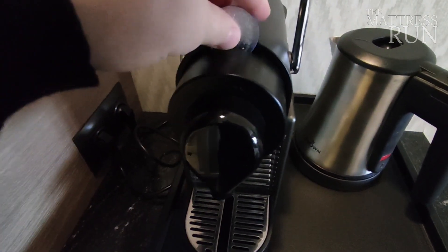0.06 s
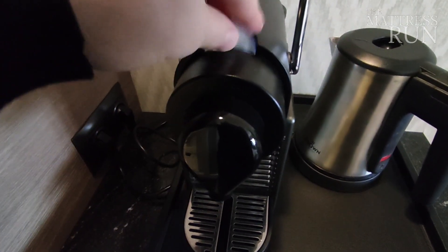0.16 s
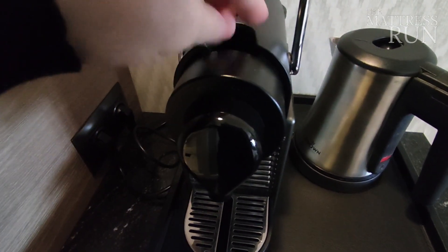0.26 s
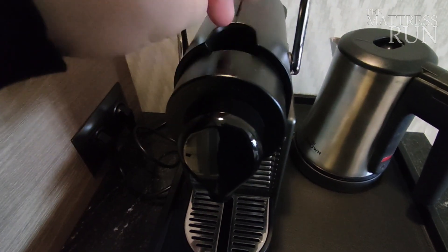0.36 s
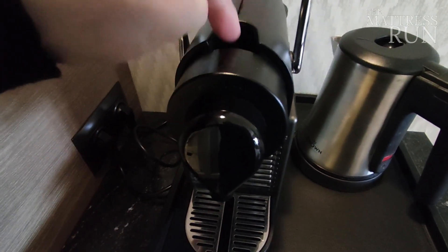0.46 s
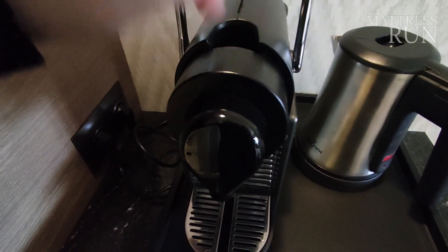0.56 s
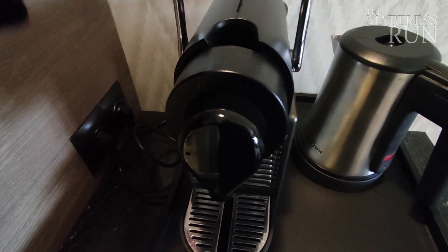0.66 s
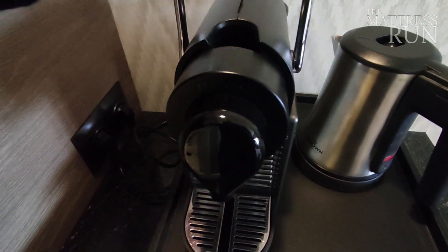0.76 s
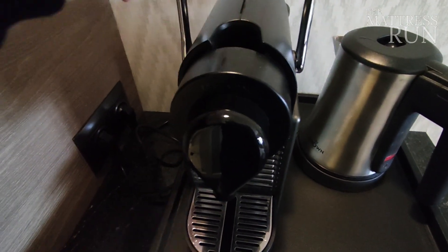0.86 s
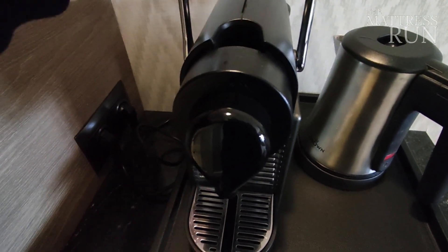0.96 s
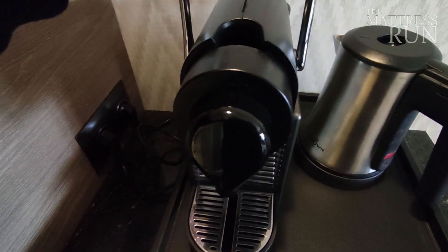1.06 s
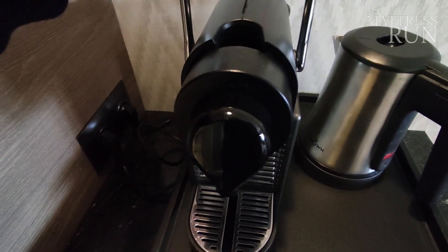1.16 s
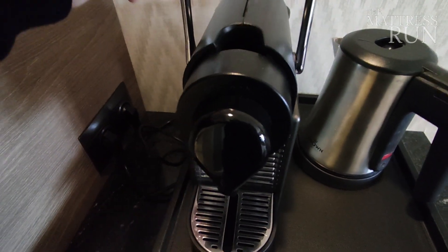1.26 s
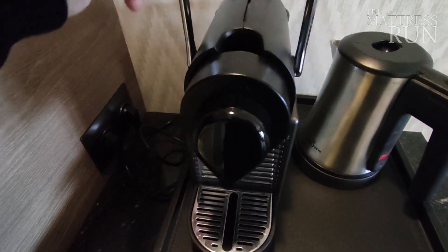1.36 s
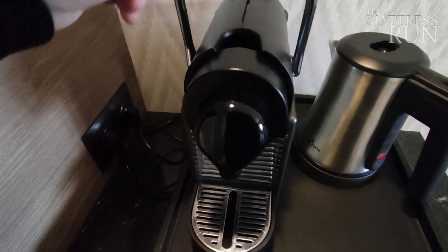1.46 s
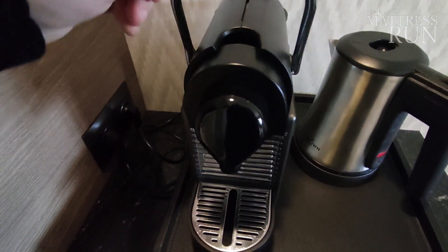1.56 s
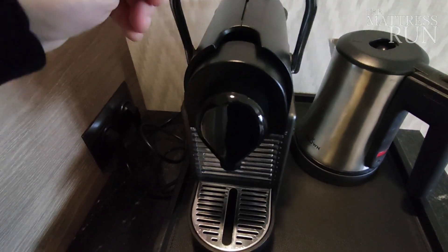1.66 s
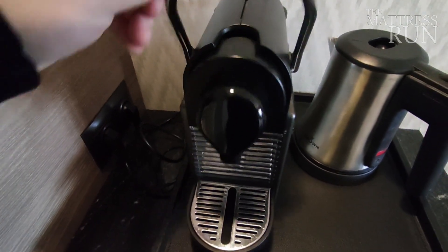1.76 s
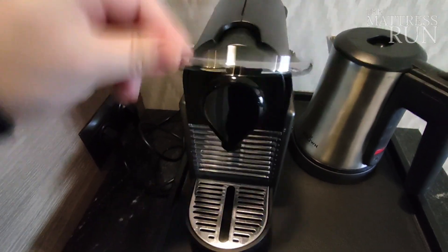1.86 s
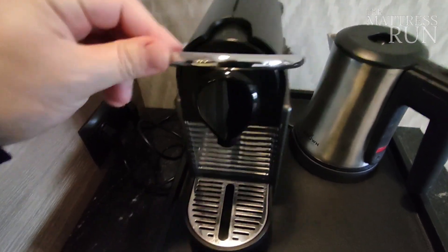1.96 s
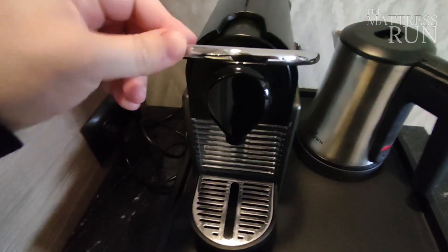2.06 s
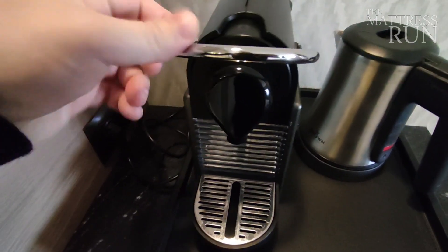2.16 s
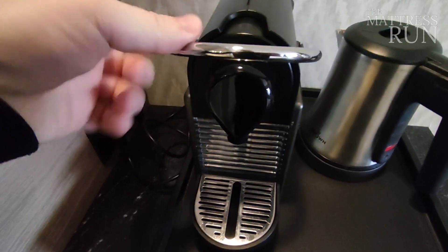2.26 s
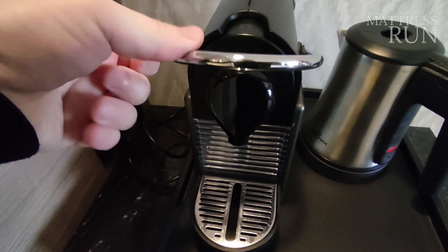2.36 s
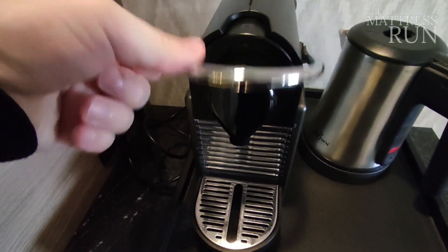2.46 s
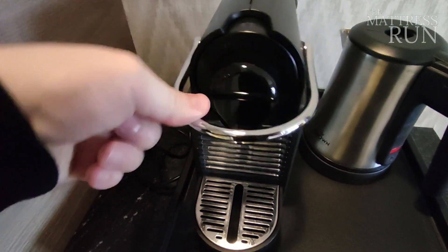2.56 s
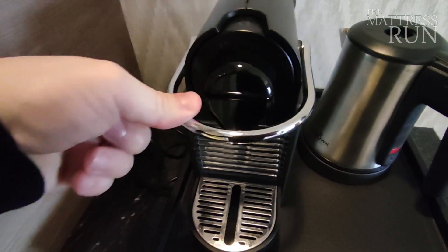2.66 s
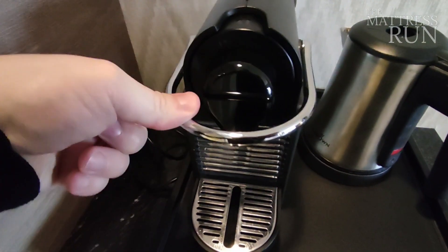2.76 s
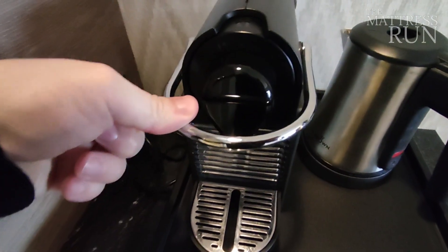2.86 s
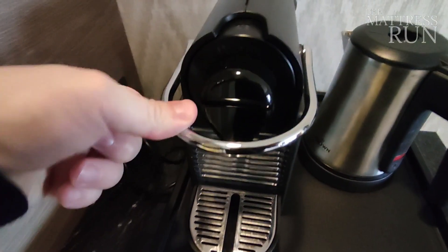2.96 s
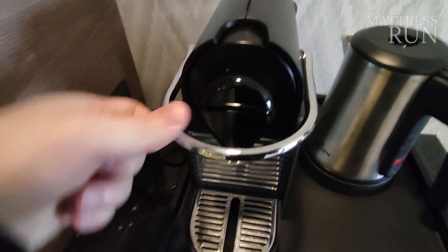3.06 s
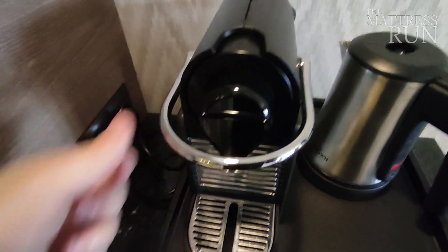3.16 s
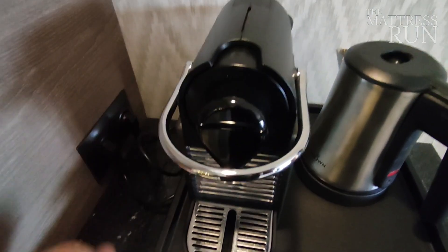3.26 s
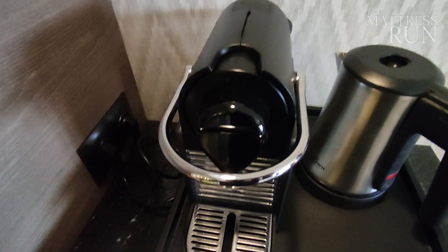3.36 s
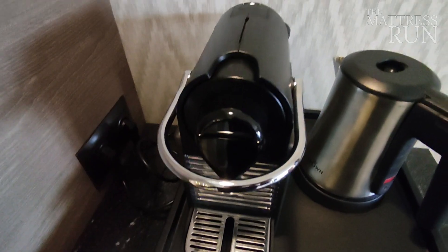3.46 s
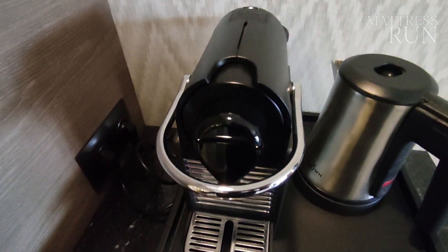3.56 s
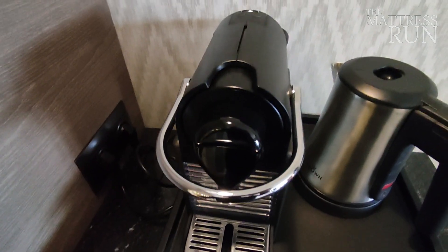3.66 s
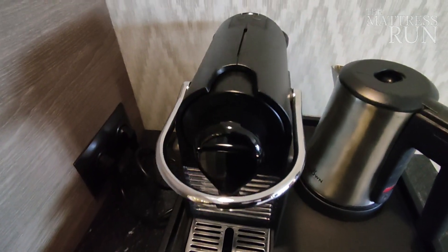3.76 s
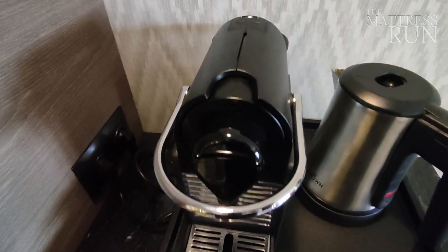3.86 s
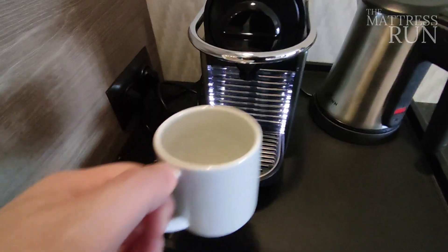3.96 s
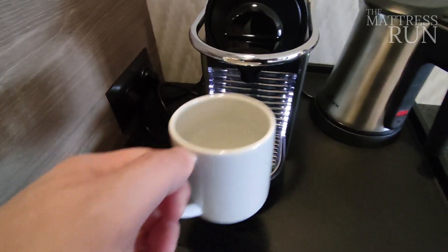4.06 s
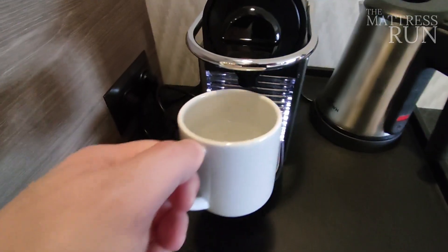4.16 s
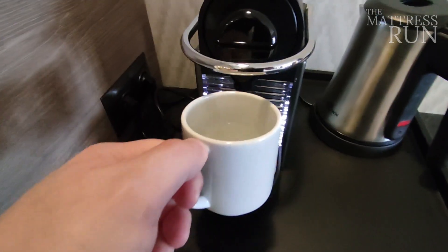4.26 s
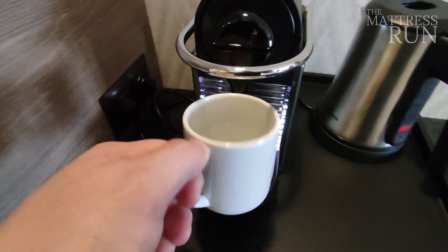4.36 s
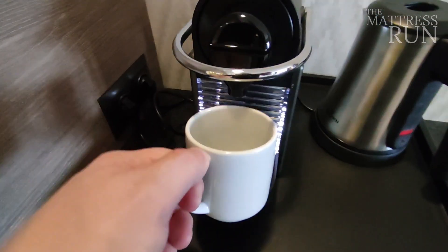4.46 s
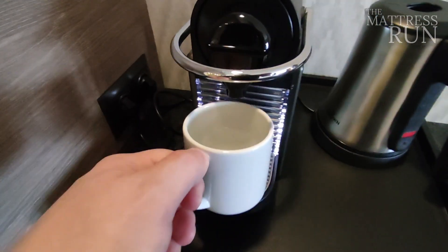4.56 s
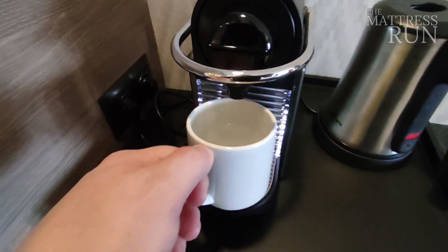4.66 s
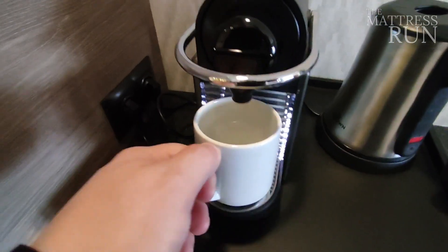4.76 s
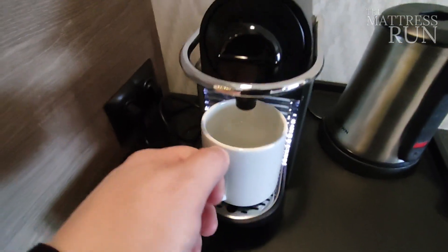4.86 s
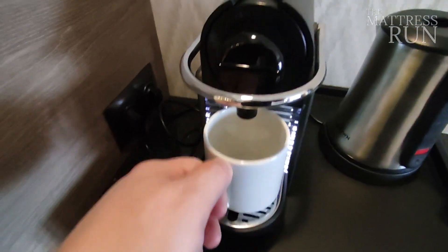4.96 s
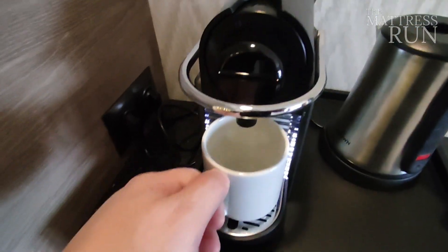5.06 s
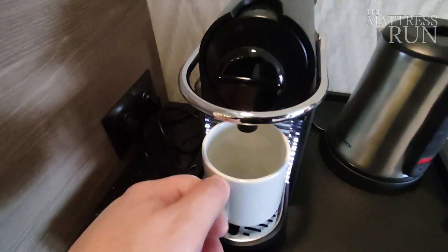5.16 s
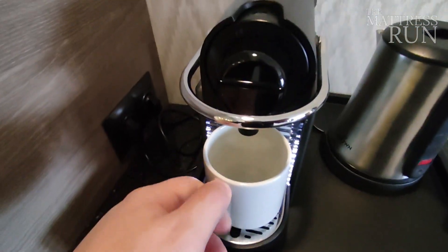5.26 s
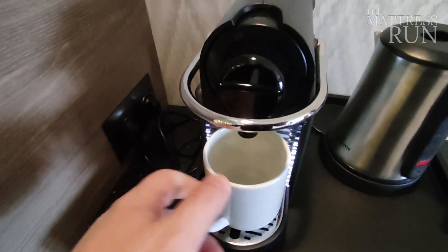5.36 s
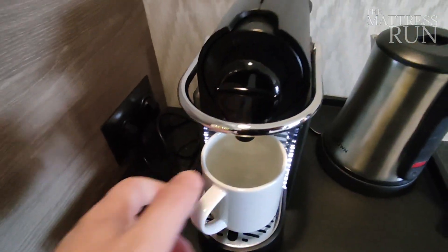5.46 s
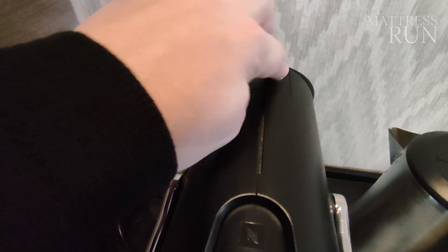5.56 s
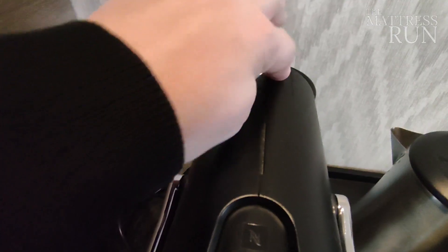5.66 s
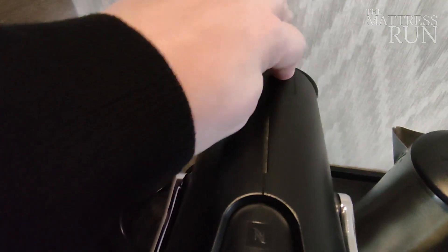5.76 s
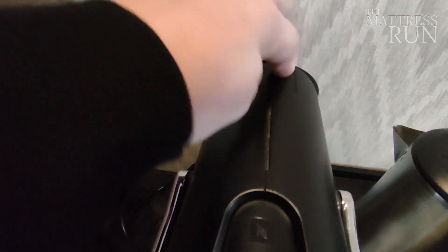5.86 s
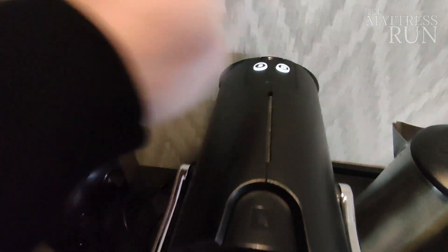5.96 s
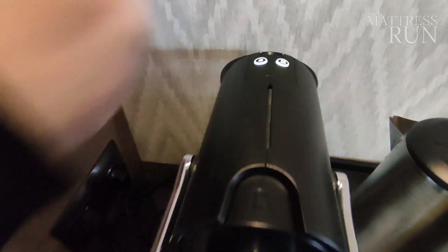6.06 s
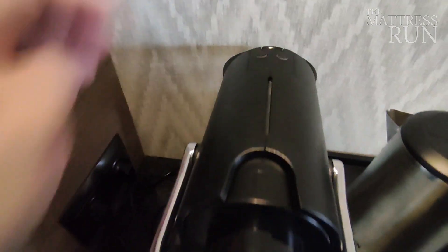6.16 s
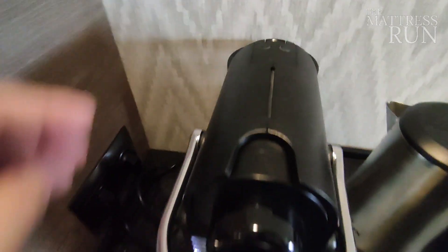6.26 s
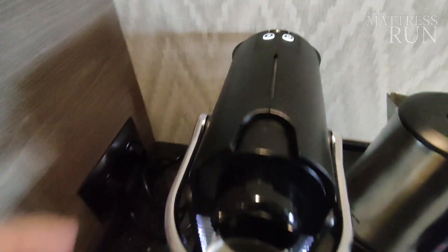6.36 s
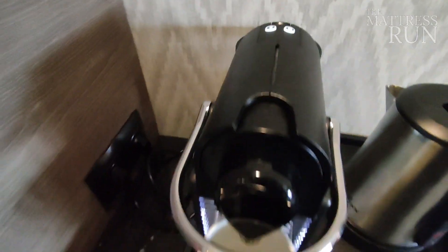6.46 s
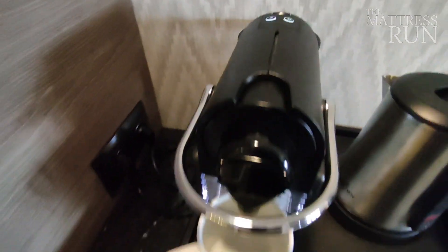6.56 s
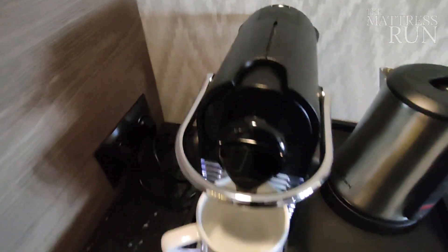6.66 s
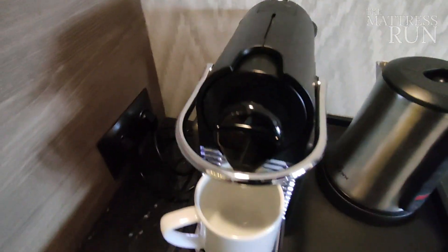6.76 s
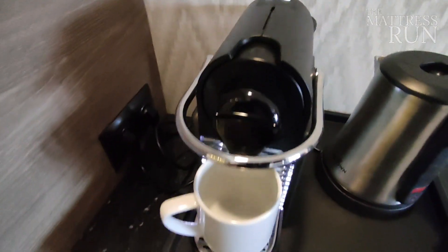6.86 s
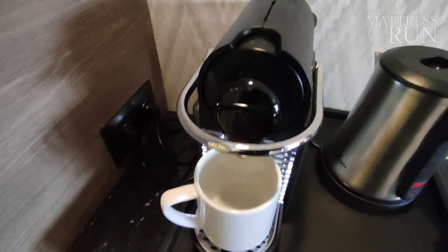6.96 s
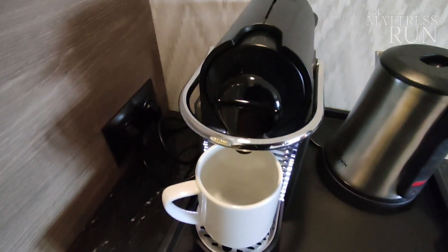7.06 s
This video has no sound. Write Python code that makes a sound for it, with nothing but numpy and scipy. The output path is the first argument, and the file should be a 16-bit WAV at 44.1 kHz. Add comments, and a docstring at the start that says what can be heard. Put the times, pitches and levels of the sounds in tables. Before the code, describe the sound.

Phone-close stereo pickup in a quiet room with a short reverberation. First come tiny plastic capsule clicks, then a pause, dull lever knocks and a strong snap with deep handling rumble. Another lull, then ceramic strikes the metal drip grid, grating and singing as it slides. A light click starts the pump: a coarse mains-rate buzz with sharp knocking, loose rattle and bright sizzle, surging at first and running on.

```python
"""In a small room with a low hum, a capsule drops into a coffee machine and its lever swings over and snaps shut.
A china mug is set on the metal drip grid and pushed under the spout; a button clicks and the vibration pump starts.
Blows are filtered noise bursts over low housing modes; sliding is grainy noise with small jerks, plus a sine squeak.
The pump strikes once per mains cycle: harmonics of the stroke rate, noise gated by the strokes, and sharp knocks.
A phone hears it close by through two ports; deep rumble swells at the lever, the mug and the pump's start."""
import sys
import numpy as np
from scipy import signal
from scipy.fft import rfft, irfft, next_fast_len
from scipy.io import wavfile
from scipy.ndimage import map_coordinates

SR = 44100
rng = np.random.default_rng(int(sys.argv[2]) if len(sys.argv) > 2 else 0)


def to_wav(s):
    """Save 16-bit WAV."""
    ch = np.atleast_2d(s).T  # columns
    pcm = np.round(np.clip(ch, -1, 1) * 32767)  # PCM
    wavfile.write(sys.argv[1], SR, pcm.astype(np.int16))


N = 313110
T = np.arange(N) / SR  # time in seconds

# Still room air. Each row: frequency in Hz, relative level in dB per Hz.
AIR = [(12, -57), (20, -3.5), (65, -17.5), (81, -13), (101, -6), (127, -16), (158, -10), (187, -29),
       (301, -23), (459, -27.5), (499, -30.5), (542, -33), (1710, -40), (7730, -45.5), (16000, -53)]
AIR_DB = -53
# Steady hum of an appliance. Each row: frequency in Hz, level in dB.
HUM = [(100, -50.5), (200, -76)]
ROOM_T60_S, ROOM_DB = 0.36, -10

# Low modes of the housing on its tray. Each row: frequency in Hz, relative level in dB, t60 in seconds.
BODY_MODES = [(102, -1.5, 0.08), (157, 2.5, 0.07), (198, 1, 0.056), (268.5, 2, 0.07), (333, 0.5, 0.06)]
# Resonances of the plastic shell. Each row: frequency in Hz, width in Hz, strength in dB.
SHELL = [(620, 63, 5), (850, 140, -0.5), (1420, 44, -4), (1720, 80, -6.5), (2450, 260, 2), (3650, 360, 8.5),
         (4100, 220, 4), (5030, 159, -5.5), (7900, 180, -10)]
# Bright ticks of hard contacts. Each row: frequency in Hz, relative level in dB.
TICK = [(800, -33.5), (1800, -15), (2800, 2.5), (5000, 1.5), (8300, 5.5), (9200, -6.5), (12000, -0.5),
        (16000, -19.5)]
# Thin clack of the capsule and the button. Each row: frequency in Hz, relative level in dB.
CAPSULE_CLACK = [(150, -37), (350, -7), (600, 1), (950, 1), (1400, -1.5), (2400, -7.5), (3500, -18),
                 (8000, -43)]
# The capsule ticks against the slot and drops in. Each row: start in seconds, clack level in dB,
# tick level in dB, tick t60 in seconds, ring favoured by the contact point in Hz.
CAPSULE = [(0.0317, -47.5, -51, 0.053, 1230), (0.0403, -47.5, -51, 0.088, 2930),
           (0.0503, -46.5, -50, .05, 1300), (.058, -43.5, -54, .04, 1900), (0.0905, -50, -53, 0.13, 1100),
           (.1915, -56, -58, .04, 1500), (0.2002, -51, -54, 0.06, 2300), (0.2148, -44, -50, 0.057, 1250),
           (.223, -44, -48, 0.058, 1600), (0.2568, -49, -45.5, 0.094, 5700), (0.273, -50, -43, 0.037, 5600),
           (.281, -47.5, -43, 0.081, 1200), (0.309, -40.5, -35, 0.023, 7560),
           (0.3151, -38, -31.5, 0.028, 2480), (.322, -41, -47, 0.036, 1160)]
# The start button. Each row: start in seconds, clack level in dB, tick level in dB, tick t60 in seconds,
# favoured ring in Hz.
BUTTON = [(5.6885, -49.5, -43, 0.052, 2230)]
# Such light parts barely rock the housing: thud relative to the clack, and its centre.
LIGHT_THUD_DB, LIGHT_THUD_HZ = -21, 330

# Hand strokes rub the capsule in, then drag the lever's carriage. Each row: time of full level in seconds,
# hold in seconds, level in dB, attack before full level in seconds, release in seconds.
PUSHES = [(.22, 0.028, -52, 0.1, 0.17), (1.415, 0.17, -47.5, 0.12, 0.28), (1.78, 0.059, -51, 0.12, .1),
          (1.89, 0.057, -37.5, 0.11, 0.1), (2.15, .35, -62, 0.19, .1), (2.565, .12, -40.5, 0.045, 0.037)]
# Rubbing of capsule and lever. Each row: frequency in Hz, relative level in dB.
LEVER_COLOUR = [(100, -15), (310, 12), (450, -4), (750, 0), (1500, -4), (2600, -6), (4000, -3), (6000, -9),
                (8200, -5), (9200, -22), (12000, -12), (16000, -31.5)]
# Rings of the hardest contacts of capsule, lever and mug. Each row: start in seconds, frequency in Hz,
# level in dB, t60 in seconds.
PINGS = [(.3165, 915, -44, 0.091), (.3165, 4010, -46, .14), (1.942, 620, -30, 0.046),
         (2.626, 813, -18, .03), (4.4464, 2280, -23, .03), (4.4473, 4090, -28, .03), (4.567, 707, -17, .04),
         (4.569, 2180, -24, .035), (4.9741, 4400, -30, .05), (4.992, 554, -27, 0.065),
         (4.996, 1365, -23, 0.047)]
# The linkage knocks, pierces the capsule and snaps shut. Each row: start in seconds, thud level in dB,
# thud centre in Hz, clack level in dB, tick level in dB, tick t60 in seconds, favoured ring in Hz.
LEVER_KNOCKS = [(1.425, -52, 260, -42, -49, 0.046, 810), (1.675, -58, 303.6, -52.5, -68, 0.05, 1000),
                (1.897, -40, 270, -34.5, -51, 0.037, 650), (1.906, -30, 265, -42, -50, .04, 620),
                (1.9285, -43, 282, -45, -33, 0.048, 6530), (1.942, -35, 255, -31, -35.5, 0.03, 780),
                (1.960, -32.5, 275, -37.5, -54, 0.051, 1200), (1.9995, -27.5, 161, -36.5, -47, 0.037, 600),
                (2.086, -35.5, 155, -54, -62, 0.16, 540), (2.0952, -67, 166, -69, -51.5, 0.037, 7900),
                (2.4512, -68, 300, -57, -64.5, 0.087, 1780), (2.6245, -29, 125, -23, -19.5, 0.047, 5120),
                (2.628, -16, 186, -22.5, -26.5, 0.04, 1400), (2.641, -23.5, 315, -29.5, -38, 0.048, 1380),
                (2.679, -29, 160, -33, -43, .05, 1700), (2.685, -29.5, 318, -34.5, -43, 0.051, 1250),
                (2.730, -35, 320, -46.5, -76, .06, 620)]
# Clack of the lever. Each row: frequency in Hz, relative level in dB.
LEVER_CLACK = [(150, -40), (350, -4), (600, -3.5), (1400, -5.5), (2400, -6), (3500, -15.5), (8000, -51)]
# Deep rumbles as the lever moves, the mug is set down and the pump starts. Each row: time of full level in
# seconds, hold in seconds, level in dB, attack before full level in seconds, release in seconds.
RUMBLES = [(2.08, 0.21, -49, .18, 0.28), (2.67, 0.11, -45.5, .1, 0.4), (4.6, 0.79, -56, 0.23, 0.33),
           (5.84, 0.29, -43.5, 0.17, .25)]

# The mug against the drip grid. Each row: start in seconds, thud level in dB, clack level in dB,
# tick level in dB, tick t60 in seconds, favoured ring in Hz.
CLINKS = [(3.925, -58.5, -49, -57, 0.018, 896), (4.179, -59, -56, -62, 0.15, 784),
          (4.276, -68, -69, -52, 0.4, 6100), (4.4463, -52, -17, -31, 0.036, 2280),
          (4.4477, -35.5, -47, -18.5, 0.025, 4090), (4.4987, -46, -63, -39, 0.052, 4000),
          (4.5585, -62, -26, -23, 0.036, 6400), (4.566, -33.5, -18, -30, 0.041, 780),
          (4.572, -39, -22, -33, 0.047, 900), (4.606, -38.5, -44.5, -43.5, 0.25, 880),
          (4.974, -43.5, -39, -31, 0.064, 4400), (4.987, -46, -32, -38.5, 0.12, 554),
          (4.996, -39, -28, -41, 0.047, 1360), (5.051, -44, -48, -45, 0.093, 6300),
          (5.163, -44.5, -44.5, -53, 0.076, 940)]
MUG_THUD_HZ = 277
# Resonances of the mug on the grid. Each row: frequency in Hz, width in Hz, strength in dB.
GRID = [(706, 150, 9.2), (880, 140, 8.3), (1380, 77, 6.8), (1490, 24, 2.64), (2280, 230, 3.3),
        (4090, 290, 2.2), (4890, 48, 6), (5540, 7.4, 7.7), (6730, 15, 10.3), (7300, 63, 4.3),
        (7900, 220, 2.8)]
# Softer knock of the mug's foot. Each row: frequency in Hz, relative level in dB.
CHINA = [(150, -30), (350, -3), (540, -2), (750, -2.5), (1400, -0.5), (2300, -0.5), (3000, -4.5),
         (4500, -4.5), (8000, -33)]
# The foot scrapes as it settles and is shoved along. Each row: time of full level in seconds,
# hold in seconds, level in dB, attack before full level in seconds, release in seconds.
SCRAPES = [(4.47, .005, -40.5, .02, 0.12), (4.6, .005, -35.5, 0.066, 0.062), (4.65, .36, -48.5, .05, .17)]
# Scraping of china on the grid. Each row: frequency in Hz, relative level in dB.
SLIDE_COLOUR = [(100, -12.5), (300, 7), (600, -1.5), (1300, -5), (2500, 0), (4000, 0), (8300, -4.5),
                (9200, -7.5), (12000, -8), (16000, -15)]
# The grid's bars sing when rubbed. Each row: frequency in Hz, width in Hz, strength in dB.
BARS = [(554, 7.2, 16), (847, 12, 15.5), (1100, 29, 11), (4400, 150, 2), (6282, 60, 8), (7800, 167, 7.5)]
# Shoves in which the mug bows the bars. Each row: time of full level in seconds, hold in seconds,
# level in dB, attack before full level in seconds, release in seconds.
SHOVES = [(4.64, .13, -48, .05, .1), (4.84, 0.038, -43, 0.075, 0.12), (5.055, .005, -49, .02, .05)]
# Rings of the bowed bars. Each row: frequency in Hz, width in Hz, relative level in dB.
SHOVE_RING = [(854, 20, 0.5), (1330, 19, -2.5), (2260, 51, -7), (3650, 83, 0), (4330, 94, -2.5),
              (5520, 48, -0.5), (6350, 55, 1), (7650, 120, 0.5), (8400, 90, -3)]
# When the rings have these pitches, and the share by which they sag per second.
SHOVE_MID_S, SHOVE_SAG_PER_S = 4.85, .2
# The foot squeaks just before it stops. Each row: time in seconds, pitch in Hz, level in dB.
SQUEAK = [(4.92, 1130, -78), (4.955, 1094, -49), (4.975, 1100, -44), (4.995, 1050, -57)]

MAINS_HZ, PUMP_START_S = 50, 5.801
# The coil hums at twice and three times the mains rate when switched on, and dies away.
COIL_DB, COIL_T60_S = -34.5, 0.95
# Strongest drone of the housing. Each row: time in seconds, level in dB.
DRONE = [(5.81, -49), (5.886, -29), (5.936, -40), (5.978, -26), (6.2, -36.5), (6.45, -43.5), (6.616, -32),
         (7.07, -32)]
# Shaking of the housing. Each row: multiple of the stroke rate, relative level in dB.
SHAKE = [(1, -4), (2, -30), (3, 1.5), (4, -6), (5, -2), (6, -2.5), (8, -16), (9, -6.5)]
# What the piston rings in the housing. Each row: frequency in Hz, relative level in dB.
PISTON_COLOUR = [(500, -15), (550, 6), (600, 4), (650, 3), (750, -1.5), (880, 1.5), (950, -1), (1040, 4.5),
                 (1130, -7), (1300, 4.5), (1500, -11), (2400, 0), (3000, -22)]
# Coarse rattle of loose parts. Each row: frequency in Hz, relative level in dB.
RATTLE_COLOUR = [(60, -27), (110, -21), (170, -3.5), (330, 3.5), (480, -9.5), (600, 3), (900, 3.5),
                 (1300, 3), (1520, 1.5), (2000, 1), (2900, -1), (3400, -2.5), (4600, 2.5), (5100, -15),
                 (8000, -21.5)]
# Fine sizzle of loose parts. Each row: frequency in Hz, relative level in dB.
FINE_COLOUR = [(3500, -17), (5200, 5.5), (5700, 10), (6100, 0), (6500, 8), (6900, 2), (7500, 5.5),
               (8200, 9.5), (8700, -0.5), (9200, -9), (11300, 0), (13000, -7), (16000, -38)]
# The strongest resonance shifts as the pump fills. Each row: time in seconds, frequency in Hz, lift in dB.
FILLING = [(5.8, 1020, 12.5), (5.95, 1014, 13), (6.1, 855, 6.5), (6.25, 818, -6), (6.4, 951, 13.5),
           (6.55, 1029, 9), (6.7, 1167, 5.5), (7.1, 1263, 6.5)]
# Stroke noise rings that resonance too: level before the lift, and width.
FILLING_DB, FILLING_WIDTH_HZ = -47, 120
# Ring of one loose panel. Each row: time in seconds, pitch in Hz, level in dB.
COVER = [(5.8, 2373, -53), (6.0, 2370, -32), (6.2, 2336, -41), (6.42, 2375, -33), (6.7, 2450, -44),
         (6.93, 2490, -32.5), (7.1, 2476, -41)]
# Ring of another loose panel. Each row: time in seconds, pitch in Hz, level in dB.
PANEL = [(5.8, 3650, -60), (6.2, 3660, -54), (6.4, 3720, -43), (6.7, 3758, -41), (6.85, 3746, -39),
         (6.93, 3747, -30.5), (7.1, 3770, -31)]
# Loose parts buzz for some strokes. Each row: time of full level in seconds, hold in seconds,
# pitch in Hz, level in dB.
CHATTER = [(5.826, .47, 1320, -35.5), (5.98, 0.036, 4330, -30), (5.988, 0.066, 7900, -33),
           (6.2, .1, 4600, -39), (6.665, .07, 3950, -32), (6.665, 0.058, 5720, -37)]
# The piston's knock on its end stop. Each row: frequency in Hz, relative level in dB.
KNOCK_COLOUR = [(400, -22.5), (900, -1), (1300, -2.5), (1700, 1), (2300, 3), (2750, -3), (3200, 0.5),
                (4400, 2.5), (5000, -7), (5500, -1.5), (6900, -7.5), (7900, 4), (8800, -15), (11500, -14),
                (16000, -30)]
REBOUND_S, REBOUND_DB = 0.001301, -5
# The pump surges as it primes, then the water pressure builds.
SURGE_S, SURGE_ATTACK_S, SURGE_HOLD_S = 5.925, 0.06, 0.044
PRESSURE_S, PRESSURE_RISE_S = 6.127, 0.46
# How each part follows them. Each law: level running free in dB, lift in the surge in dB,
# release of the surge in seconds, lift at full pressure in dB.
HUM_LAW = (-40, 0, 0, 1.5)
PISTON_LAW = (-35, 8, 1.17, -5)
RATTLE_LAW = (-31.7, 7, 0.34, 0.7)
FINE_LAW = (-39.5, 12, 0.14, 6)
KNOCK_LAW = (-37, 8, 0.01, 3.5)

# Balance of the two microphone ports. Each row: frequency in Hz, left minus right in dB.
PORTS = [(100, 0), (250, .7), (700, -.5), (1300, -1.5), (2400, -.7), (4400, 0), (5700, 4), (7000, 8),
         (8100, 12), (9000, 4), (12000, 2), (15000, 3.5)]
TOP_HZ = 16000


def undb(db):
    """Decibels to gain."""
    return 10 ** (np.asarray(db) / 20)


def unit(x):
    """Scale to rms 1."""
    return x / np.sqrt(np.mean(x ** 2))


def fade(t, t60):
    """Exponential decay by 60 dB in t60 seconds."""
    return np.exp(-np.log(1000) * t / t60)


def walk(rate, t=T):
    """Random wandering, in straight lines between normal random points at the given rate per second."""
    points = rng.standard_normal(2 ** 11)
    return np.interp(t * rate, np.arange(len(points)), points)


def noise(size, apart_hz=900):
    """Noise at two ports: alike in the bass, unrelated in the treble."""
    f = np.arange(size // 2 + 1) * SR / size
    alike = 1 / (1 + (f / apart_hz) ** 2)
    mid, side = rfft(rng.standard_normal((2, size)))
    mid = mid * np.sqrt(1 + alike)
    side = side * np.sqrt(1 - alike)
    return irfft(np.array([mid + side, mid - side]), size) / np.sqrt(2)


def colour(x, spectrum, peaks=()):
    """Causal (minimum-phase) filter: a smooth spectrum with resonances standing on it."""
    size = next_fast_len(x.shape[-1] // 2 + 4096) * 2
    f = np.arange(size // 2 + 1) * SR / size + 1e-3
    hz, db = np.transpose(spectrum)
    smooth = undb(np.interp(np.log(f), np.log(hz), db))
    power = 1 + sum(undb(2 * lift) / (1 + (2 * (f - centre) / width) ** 2) for centre, width, lift in peaks)
    # folding the cepstrum onto positive times makes the filter causal
    cepstrum = irfft(np.log(smooth * np.sqrt(power)))
    cepstrum[1:size // 2] *= 2
    cepstrum[size // 2 + 1:] = 0
    response = np.exp(rfft(cepstrum))
    return irfft(rfft(x, size) * response)[..., :x.shape[-1]]


def background():
    """Still room air as coloured noise, and a steady appliance hum of slightly wavering sines."""
    hum = 0
    for hz, db in HUM:
        gain = undb(db + .3 * walk(6)) * np.sqrt(2)
        hum = hum + gain * np.sin(2 * np.pi * hz * T + .1 * walk(5))
    air = unit(colour(noise(N, apart_hz=494.4), AIR))
    return hum + air * undb(AIR_DB + 0.62 * walk(2.8))


def blows(table, peaks, clack, rise_s, clack_longer, apart_hz, favour_db, favour_width, crack_db,
          tick_rise_s=0.00089, thud_rise_s=0.002, spread=0.24, thud_apart=.2):
    """Each blow gives a tick and a softer clack in the struck part, and rocks the housing."""
    t = T[:SR // 2]
    out = np.zeros((2, N))
    # the ring of the struck part under a hard and under a softer contact
    click = 1. * (t[:SR // 10] == 0)
    responses = [colour(click, spectrum, peaks) for spectrum in (TICK, clack)]
    for s, thud_db, thud_hz, clack_db, tick_db, t60, ring_hz in table:
        span = slice(int(s * SR), int(s * SR) + len(t))
        favour = signal.iirpeak(ring_hz, 1 / favour_width, fs=SR)
        contacts = ((tick_db, t60, tick_rise_s), (clack_db, t60 * clack_longer, rise_s))
        for response, (db, decay, rise) in zip(responses, contacts):
            response = response + undb(favour_db) * signal.lfilter(*favour, response)
            response = response / np.linalg.norm(response)
            contact = noise(len(t), apart_hz) * fade(t, decay) * (1 - np.exp(-t / rise))
            # the first touch reaches both ports alike
            contact[:, int(rise * SR)] += undb(crack_db) * np.linalg.norm(contact[0])
            out[:, span] += 2 * undb(db) * signal.fftconvolve(contact, response[None])[:, :len(t)]
        # where the blow lands decides which of the low modes answer
        thud = 0
        for hz, db, ring_s in BODY_MODES:
            answer = undb(db) * np.exp(-(np.log(hz / thud_hz) / spread) ** 2)
            tone = np.sin(2 * np.pi * hz * t + [[thud_apart], [-thud_apart]])
            thud = thud + answer * fade(t, ring_s) * tone
        thud = thud * (1 - np.exp(-t / thud_rise_s))
        out[:, span] += undb(thud_db) * 2 * thud / np.abs(thud).max()
    return out


def capsule_and_button():
    """Light plastic parts tick and clack in the shell, with hardly any thud."""
    light = []
    for s, clack_db, *rest in CAPSULE + BUTTON:
        light.append((s, clack_db + LIGHT_THUD_DB, LIGHT_THUD_HZ, clack_db, *rest))
    return blows(light, SHELL[2:], CAPSULE_CLACK, rise_s=0.00066, clack_longer=1.2, apart_hz=1700,
                 favour_db=3.0, favour_width=0.3, crack_db=-11)


def room(x, build_s=0.0019):
    """A short tail from the near walls, dull in the treble."""
    t = T[:SR * 3 // 4]
    tail = noise(len(t)) * fade(t, ROOM_T60_S) * (1 - np.exp(-t / build_s))
    tail = colour(tail, [(100, 5.0), (500, -0.5), (4000, 0.0), (8000, -10.0), (15000, -4.0)])  # Hz, dB
    return x + undb(ROOM_DB) * signal.fftconvolve(x, tail / np.linalg.norm(tail[0]), axes=1)[:, :N]


def grains(spread_db, size=24):
    """Noise of tiny contacts of uneven strength, each lasting size samples."""
    strength = undb(spread_db * np.minimum(rng.exponential(size=N // size + 1), np.pi))
    return noise(N) * np.repeat(strength, size)[:N]


def slips(per_s, spread_db=4):
    """Sticking surfaces let go in small, irregular jerks."""
    happens = rng.random(N) < per_s / SR
    return unit(happens * undb(spread_db * np.clip(rng.standard_normal(N), -2, 2)))


def nearby(x, echo_db, drift_s, count=4):
    """Echoes off tray, kettle and wall comb the spectrum; the notches shift as the phone moves."""
    out = x.copy()
    for port in range(2):
        for lag in rng.uniform(.0015, .008, count):
            out[port] += undb(echo_db) * np.interp(T - lag - drift_s * walk(3), T, x[port])
    return out


def swells(table):
    """Gain of swelling sounds: each rises by 20 dB in its attack, holds, and keeps sinking 20 dB per release."""
    power = 0
    for s, hold, db, attack, release in table:
        away = np.maximum(s - T, 0) / attack + np.maximum(T - s - hold, 0) / release
        power = power + undb(db - 20 * away) ** 2
    return np.sqrt(power)


def rub(table, spectrum, peaks, grain_db, catch_db, slip_rate, slip_db):
    """Sliding contact: dense grains, and jerks where it catches and lets go."""
    contact = unit(grains(grain_db)) + undb(slip_db) * slips(slip_rate)
    contact = unit(nearby(colour(contact, spectrum, peaks), echo_db=-6.0, drift_s=.0001))
    return contact * swells(table) * undb(catch_db * walk(70))


def pushes():
    """The capsule and then the lever's carriage rub against the shell."""
    return rub(PUSHES, LEVER_COLOUR, SHELL[:3], grain_db=2.5, catch_db=1.16, slip_rate=200, slip_db=-1)


def pings(split=0.096, second_db=-7):
    """A hard contact rings briefly in a close pair of modes that depends on the contact point."""
    out, t = np.zeros((2, N)), T[:SR // 4]
    for s, hz, db, t60 in PINGS:
        phases = 2 * np.pi * rng.random((2, 2, 1))
        first = np.sin(2 * np.pi * hz * t + phases[0] / 4)
        second = undb(second_db) * np.sin(2 * np.pi * hz * (1 + split) * t + phases[1])
        envelope = fade(t, t60) * (1 - np.exp(-t / 0.00037))
        out[:, int(s * SR):int(s * SR) + len(t)] += undb(db) * (first + second) * envelope
    return out


def lever():
    """The linkage knocks and snaps in the shell, rocking the housing with heavier thuds."""
    return blows(LEVER_KNOCKS, SHELL, LEVER_CLACK, rise_s=0.00087, clack_longer=1.18, apart_hz=1700,
                 favour_db=8.5, favour_width=0.46, crack_db=-10)


def rumble():
    """Deep noise, nearly alike at both ports, swells at the lever, the mug and the pump's start."""
    spectrum = [(12, -13.5), (28, -1.5), (60, -7.5), (90, -16.5), (180, -42.5), (600, -71.0)]  # Hz, dB
    return unit(colour(noise(N, apart_hz=110), spectrum)) * swells(RUMBLES)


def mug_blows():
    """China strikes the metal grid, and both ring."""
    clinks = [(s, thud_db, MUG_THUD_HZ, *rest) for s, thud_db, *rest in CLINKS]
    return blows(clinks, GRID, CHINA, rise_s=0.00249, clack_longer=0.79, apart_hz=2090,
                 favour_db=4, favour_width=0.22, crack_db=-14.0)


def scrapes():
    """The mug's foot rubs the bars of the grid and makes them sing."""
    return rub(SCRAPES, SLIDE_COLOUR, BARS, grain_db=2.5, catch_db=1.5, slip_rate=200, slip_db=-4.0)


def sing(drive, hz, width_hz):
    """A noisy contact rings one resonance whose pitch may glide."""
    pole = np.exp(-np.pi * abs(width_hz) / SR)
    contact = drive * (rng.standard_normal((2, N)) + 1j * rng.standard_normal((2, N)))
    ring = signal.lfilter([np.sqrt(1 - pole ** 2)], [1, -pole], contact)
    # the resonance is made at zero frequency, then shifted up to its pitch
    return np.real(ring * np.exp(2j * np.pi * np.cumsum(hz) / SR))


def shove(catch_db=2.5, wander=.012, slip_rate=450):
    """The sliding mug bows the bars in small jerks; their rings waver and sag as it moves along them."""
    drive = swells(SHOVES) * undb(catch_db * walk(90)) * slips(slip_rate)
    glide = 1 - SHOVE_SAG_PER_S * np.clip(T - SHOVE_MID_S, -.2, .1)
    total = np.sqrt(sum(undb(db) ** 2 for _, _, db in SHOVE_RING))
    rings = 0
    for hz, width, db in SHOVE_RING:
        rings = rings + undb(db) * sing(drive, hz * glide * (1 + wander * walk(20)), width)
    return rings / total


def squeak(wobble_hz=25):
    """Stick-slip of glazed china on steel, as a sine of wobbling pitch."""
    s, hz, db = np.transpose(SQUEAK)
    phase = 2 * np.pi * np.cumsum(np.interp(T, s, hz) + wobble_hz * walk(150)) / SR
    return np.sqrt(2) * np.sin(phase) * undb(np.interp(T, s, db)) * (T > s[0]) * (T < s[-1])


def buzz(partials, waver_db, scatter, wander, apart_hz, lift_width=0.2, rough_db=1.9):
    """Multiples of the stroke rate; the housing smears their phases, and they waver as the phone moves."""
    start = int(PUMP_START_S * SR)
    t, out = T[:N - start], np.zeros((2, N))
    s, *columns = np.transpose(FILLING)
    lift_hz, lift_db = (np.interp(T[start:], s, column) for column in columns)
    for multiple, db in partials:
        hz = round(multiple) * MAINS_HZ
        lift = lift_db * np.exp(-(np.log(hz / lift_hz) / lift_width) ** 2)
        gain = undb(db + waver_db * walk(5.05, t) + rough_db * walk(MAINS_HZ, t) + lift)
        phase = 2 * np.pi * hz * (t - .003) + scatter * rng.standard_normal() + wander * walk(5.55, t)
        apart = hz / apart_hz * walk(2.54, t)
        out[:, start:] += gain * np.cos([phase + apart, phase - apart])
    return out * np.clip((T - PUMP_START_S) / 0.0061, 0, 1)


def coil():
    """The pump's magnet hums hardest just after it is switched on."""
    tone = buzz([(2, 0), (3, 1)], waver_db=1, scatter=2, wander=.15, apart_hz=1000)
    return tone * undb(COIL_DB) * fade(np.maximum(T - PUMP_START_S, 0), COIL_T60_S)


def drone():
    """The side wall of the housing hums on the fifth to seventh multiples of the stroke rate."""
    tone = buzz([(5, -9), (6, -9), (7, 0)], waver_db=1.2, scatter=2, wander=.15, apart_hz=2500)
    return tone * undb(np.interp(T, *np.transpose(DRONE)))


def strokes(scatter_db, jitter_s):
    """One impulse per mains cycle from the moment the pump is switched on."""
    times = np.arange(PUMP_START_S, T[-1] - .002, 1 / MAINS_HZ)
    chance = rng.standard_normal((len(times), 2))
    places = np.round((times + jitter_s * chance[:, 0]) * SR).astype(int)
    out = np.zeros(N)
    out[np.clip(places, 0, N - 1)] = undb(scatter_db * chance[:, 1])
    return out


def load(law):
    """Gain of one part of the pump: shifted by the priming surge, then by the growing pressure."""
    free_db, surge_db, release_s, pressure_db = law
    surge = 0
    if surge_db:
        rise = (T - SURGE_S) / SURGE_ATTACK_S
        fall = 1 - (T - SURGE_S - SURGE_ATTACK_S - SURGE_HOLD_S) / release_s
        surge = np.clip(np.minimum(rise, fall), 0, 1)
    pressure = np.sin(np.pi / 2 * np.clip((T - PRESSURE_S) / PRESSURE_RISE_S, 0, 1))
    return undb(free_db + surge_db * surge + pressure_db * pressure)


def end_stop(delay_s=.0034, t60=0.062, crack_db=-16, change_per_s=7, count=3):
    """The piston hits its stop and rebounds: a sharp knock at every stroke, its ring changing over time."""
    kicks = strokes(scatter_db=1.8, jitter_s=.00006)
    first = np.roll(kicks, int(delay_s * SR))
    rebound = undb(REBOUND_DB) * np.roll(kicks, int((delay_s + REBOUND_S) * SR))
    hits = (first + rebound) * (T > PUMP_START_S)
    # wandering shares blend several noise rings
    shares = np.array([walk(change_per_s) for _ in range(count)])
    t, out = T[:SR // 10], 0
    for share in shares / np.linalg.norm(shares, axis=0):
        ring = noise(len(t)) * fade(t, t60)
        out = out + signal.oaconvolve((hits * share)[None], ring / np.linalg.norm(ring[0]))[:, :N]
    return colour(out + undb(crack_db) * hits, KNOCK_COLOUR)


def panels(gate, cover_width_hz=110, panel_width_hz=60, chatter_width_hz=80, chatter_fade_s=.03):
    """Stroke noise rings two loose panels and the filling pump at creeping pitches; small parts join briefly."""
    drive, out = gate / np.sqrt(np.mean(gate[T > PUMP_START_S] ** 2)), 0
    curves = ((COVER, cover_width_hz, 0), (PANEL, panel_width_hz, 0), (FILLING, FILLING_WIDTH_HZ, FILLING_DB))
    for curve, width, base_db in curves:
        s, hz, db = np.transpose(curve)
        out = out + sing(drive, np.interp(T, s, hz), width) * undb(base_db + np.interp(T, s, db))
    for s, hold, hz, db in CHATTER:
        swell = swells([(s, hold, db, chatter_fade_s, chatter_fade_s)])
        out = out + sing(drive * swell, np.full(N, hz), chatter_width_hz)
    return out


def shifting(x, depth_db, width_hz=170, per_s=5.5):
    """Standing waves between machine and walls: narrow peaks and dips come and go as the phone moves."""
    f, t, z = signal.stft(x, SR, nperseg=1024)
    place = np.meshgrid(f / width_hz, t * per_s, indexing="ij")
    ripple = map_coordinates(rng.standard_normal((256, 128)), place, order=1, mode="mirror")
    depth = depth_db * np.clip(f / 2000, 0, 1)[:, None]  # shallower in the bass
    return signal.istft(z * undb(depth * np.minimum(ripple, 1)), SR)[1][:, :N]


def pump(rattle_t60=0.085, rattle_rise_s=0.0032, lead_s=0.017):
    """The piston shakes the housing, knocks on its end stop and sets loose parts rattling at every stroke."""
    shake = buzz(SHAKE, waver_db=2.3, scatter=2, wander=.25, apart_hz=1000)
    multiples = np.arange(10, 60)
    levels = np.interp(multiples * MAINS_HZ, *np.transpose(PISTON_COLOUR))
    piston = buzz(zip(multiples, levels), waver_db=1.5, scatter=0.94, wander=1.1, apart_hz=1430)
    # loose parts chatter afresh in each cycle, hardest just after the stroke, over a steady floor
    t = T[:SR // 5]
    burst = fade(t, rattle_t60) * (1 - np.exp(-t / rattle_rise_s))
    kicks = strokes(scatter_db=1.1, jitter_s=.0003)
    floor = .17 * np.clip((T - PUMP_START_S) / lead_s + 1, 0, 1)
    gate = signal.fftconvolve(kicks, burst)[:N] + floor
    parts = gate * grains(2.7, size=45)
    grit = gate * grains(2.5, size=40)
    coarse = nearby(colour(parts, RATTLE_COLOUR), echo_db=-7.0, drift_s=.00007)
    sizzle = nearby(colour(grit, FINE_COLOUR), echo_db=-5.5, drift_s=.00006)
    layers = [(shake, HUM_LAW), (piston, PISTON_LAW), (coarse, RATTLE_LAW), (sizzle, FINE_LAW),
              (end_stop(), KNOCK_LAW)]
    housing = 0
    for x, law in layers:
        housing = housing + x * load(law) / np.std(x.mean(axis=0)[T > PUMP_START_S])
    return panels(gate) + shifting(housing, depth_db=5.5)


def scene():
    """Capsule, lever and mug with a room tail, then the pump, over rumble and background."""
    machine = capsule_and_button() + pushes() + lever()
    mug = mug_blows() + scrapes() + shove() + squeak()
    running = pump() + coil() + drone()
    return room(machine + mug) + pings() + running + rumble() + background()


def record(dry):
    """The left port is the louder one in the upper treble; the phone cuts the top."""
    left = colour(dry[0], [(hz, db / 2) for hz, db in PORTS])
    right = colour(dry[1], [(hz, -db / 2) for hz, db in PORTS])
    top_cut = signal.ellip(8, .2, 70, TOP_HZ, fs=SR, output="sos")
    return signal.sosfilt(top_cut, np.array([left, right]))


dry = scene()
out = record(dry)
to_wav(out)
```